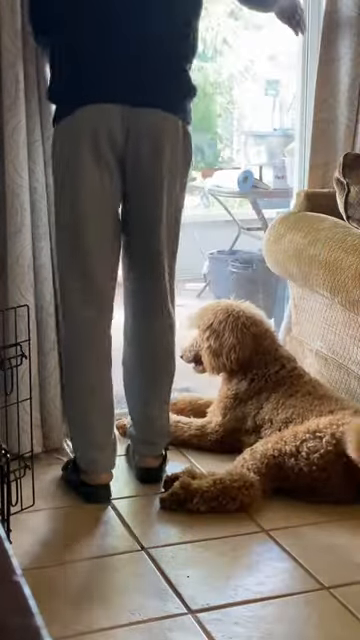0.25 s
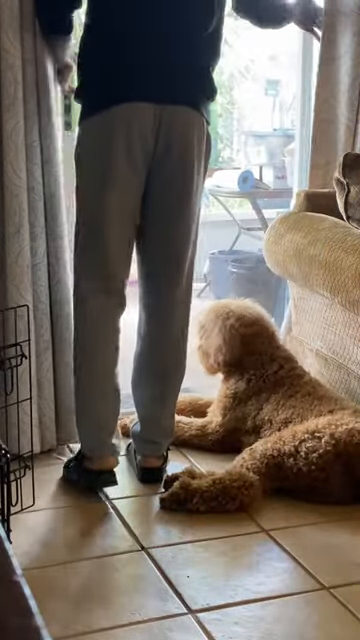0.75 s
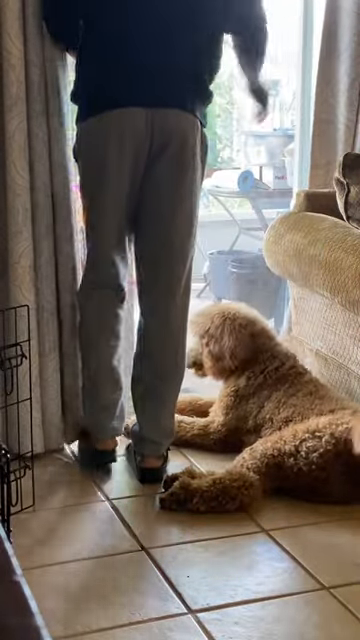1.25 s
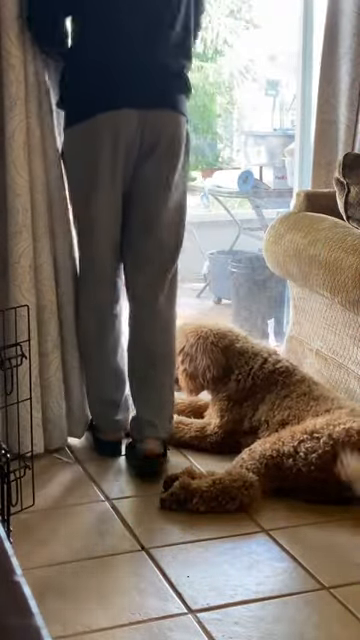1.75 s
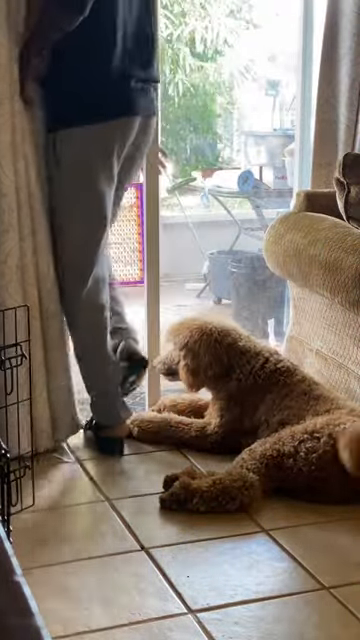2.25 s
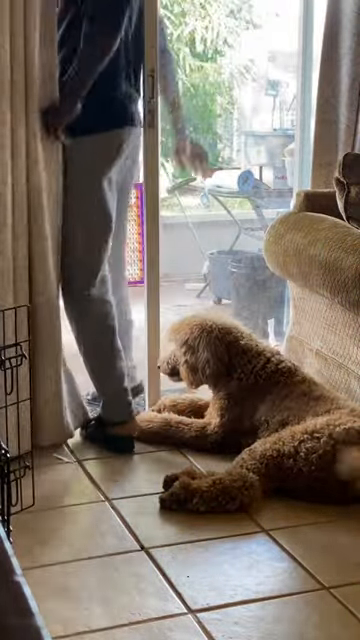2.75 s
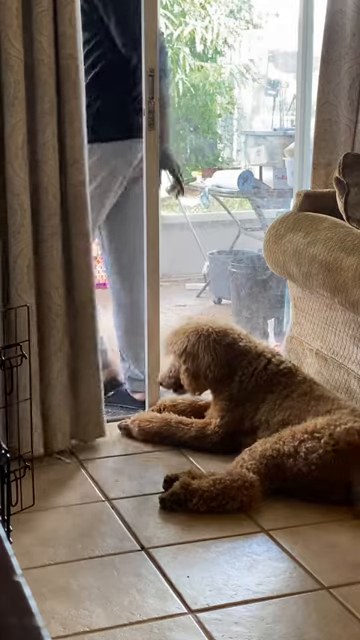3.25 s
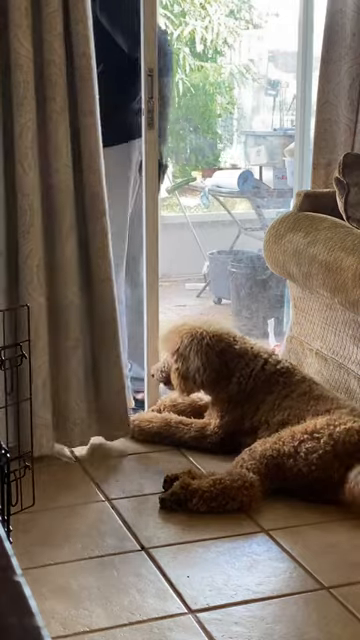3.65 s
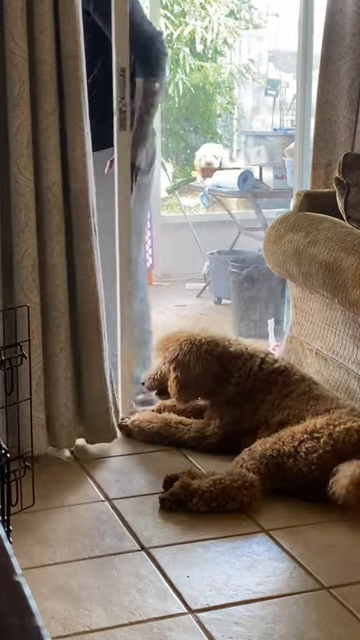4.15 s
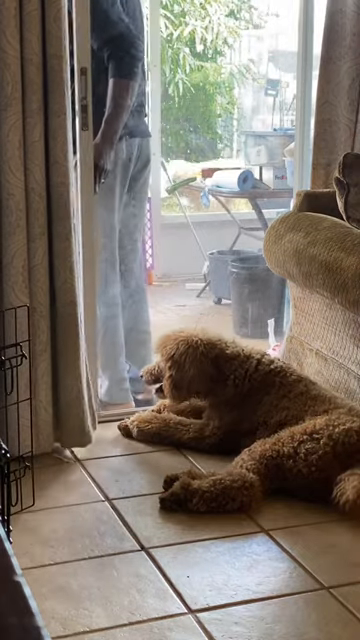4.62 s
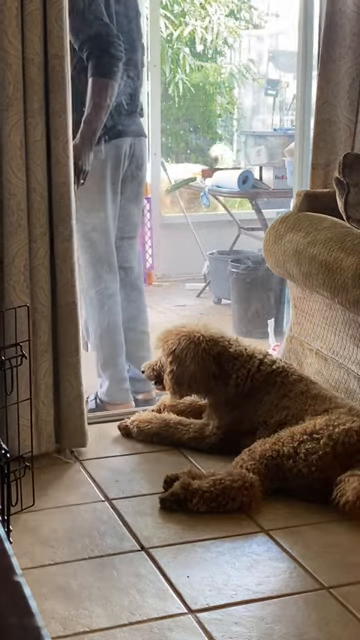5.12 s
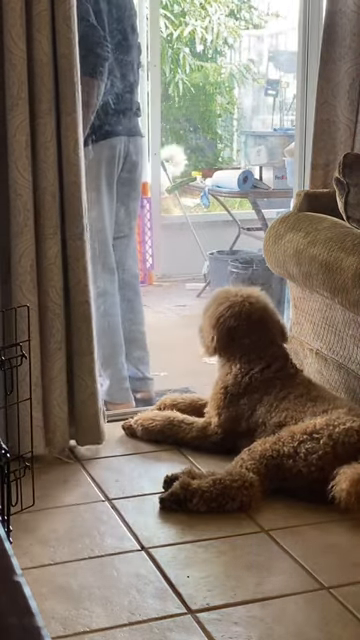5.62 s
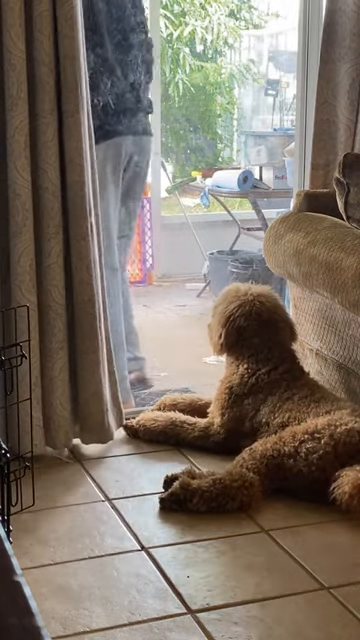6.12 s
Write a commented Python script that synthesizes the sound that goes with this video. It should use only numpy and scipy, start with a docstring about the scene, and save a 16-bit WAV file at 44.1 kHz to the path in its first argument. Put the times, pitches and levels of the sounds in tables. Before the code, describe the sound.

Close indoor sound of a sliding patio door: a brief scuff, then a swelling, gritty roll with deep glass rumble and a jangling metallic latch. Hollow knocks and soft footfalls fill the middle. A second, longer roll grinds along the track to a sharp click, then fades into scuffs and low bumps. A low hum and wavering bass boom lie underneath, nearly centred, with very faint hiss.

```python
"""First a soft boom, a knock and a scuff over a low room hum; then a heavy glass door rolls along its track, twice.
Place: a tiled room, with two close microphones that hear nearly the same sound.
The pane booms as a wavering sine, a low pane mode near 90 Hz; the rollers are dense random contacts that
shake the glass, grind in the track and hiss over grit. The loose latch rattles as taps into ringing modes;
frame and sandals knock and scuff as short noise bursts, pushes and rubs."""
import sys
import numpy as np
from scipy import signal
from scipy.fft import rfft, irfft, next_fast_len
from scipy.io import wavfile
from scipy.ndimage import uniform_filter1d

SR = 44100
rng = np.random.default_rng(int(sys.argv[2]) if len(sys.argv) > 2 else 0)


def unload_audio(sound):
    """Save the sound as a 16-bit wav file, at the path given as the first command line argument."""
    columns = np.transpose(np.atleast_2d(sound))
    # keep every value between -1 and 1, then stretch to whole-number steps
    steps = np.round(np.clip(columns, -1, 1) * 32767)
    wavfile.write(sys.argv[1], SR, steps.astype(np.int16))


N = 281269   # samples


def from_db(db):
    """Decibels to gain."""
    return 10 ** (np.asarray(db) / 20)


def rms_one(x):
    """Scale to unit rms."""
    return x / np.sqrt(np.mean(x ** 2) + 1e-20)


def in_time(rows):
    """Columns of a curve, the first being t/s, at every sample."""
    s, *columns = np.transpose(rows)
    return [np.interp(np.arange(N) / SR, s, c) for c in columns]


def coloured(x, spectrum):
    """Weigh each frequency by a table of f/Hz and level/dB, joined along log frequency."""
    hz, db = np.transpose(spectrum)
    size = next_fast_len(N)
    log_hz = np.log(np.arange(size // 2 + 1) * SR / size + 1)
    gain = from_db(np.interp(log_hz, np.log(hz), db))
    return irfft(rfft(x, size) * gain, size)[..., :N]


def dulled(x, hz):
    """Steep low-pass: heavy bodies carry little above their modes."""
    return signal.sosfilt(signal.butter(4, min(hz, .45 * SR), fs=SR, output="sos"), x)


def drift(rate):
    """Slow chance of rms 1: low-passed noise made at every 40th sample; a higher rate wavers faster."""
    r = np.exp(-80 * np.pi * rate / SR)
    noise = rng.standard_normal(N // 40 + 2002)
    slow = signal.lfilter([1], [1, -2 * r, r * r], noise)[2000:]   # the filter has settled
    return np.interp(np.arange(N) / 40, np.arange(len(slow)), rms_one(slow))


def grains(per_s, spread_db):
    """Uneven clicks at random times, one draw for the direct sound and one for the diffuse sound."""
    sizes = from_db(spread_db * np.minimum(rng.exponential(1, (2, N)), 4))
    signs = rng.choice([-1, 1], (2, N))
    return sizes * signs * (rng.random((2, N)) < per_s / SR) + 1e-18


def bursts(times, level_db, hold_s, t60, rise_s):
    """Envelope of events that rise up to their time, hold and die away; overlaps add in power."""
    out = np.zeros(N)
    for s, db, hold, fall in np.broadcast(times, level_db, hold_s, t60):
        start = max(round((s - rise_s) * SR), 0)
        t = np.arange(min(SR // 2, N - start)) / SR
        decay_db = 60 * np.maximum(t - rise_s - hold, 0) / max(fall, .01)
        shape = np.minimum(t / rise_s, 1) * from_db(db - decay_db)
        out[start:start + len(t)] = np.hypot(out[start:start + len(t)], shape)
    return out


def resonance(x, hz, width_hz):
    """One mode driven by x, gain 1 on top."""
    r = np.exp(-np.pi * width_hz / SR)
    top = np.array([1, 0, -1]) * (1 - r * r) / 2
    return signal.lfilter(top, [1, -2 * r * np.cos(2 * np.pi * hz / SR), r * r], x)


def mode_sum(x, modes, waver_db=0):
    """Modes in parallel, signs alternating; each may swell and fade by chance."""
    out = 0
    for k, (hz, width_hz, db) in enumerate(modes):
        level_db = db + waver_db * drift(3.6) if waver_db else db
        out = out + from_db(level_db) * (-1) ** k * resonance(x, hz, width_hz)
    return out


def modes_of(x, modes):
    """Modes in parallel, scaled to rms 1."""
    return rms_one(mode_sum(x, modes))


def evened(x, window_s):
    """A mode that is driven all the time keeps a fairly even swing."""
    return x / np.sqrt(uniform_filter1d(x ** 2, round(window_s * SR), axis=-1) + 0.026)


# Spectrum of the low room hum: f/Hz, relative level/dB (per Hz)
HUM_SPECTRUM = [(15, -44), (25, -16.5), (43, -5.5), (91, 6.5), (213, -18), (281, -21), (328, -24),
                (377, -9.5), (516, -41), (604, -40.5), (1600, -57), (2080, -87), (3520, -120)]
# Spectrum of the faint steady hiss in the air: f/Hz, relative level/dB (per Hz)
AIR_SPECTRUM = [(880, -31.5), (1500, -1), (1940, -9.5), (3160, -11.5), (3910, -8), (4840, -11),
                (12500, -16.5), (16200, -43.5), (22000, -120)]


def room():
    """Low hum and a faint steady hiss: noise shaped to each spectrum."""
    hum_db, air_db = -56, -93.5   # rms
    hum = from_db(hum_db) * rms_one(coloured(rng.standard_normal((2, N)), HUM_SPECTRUM))
    air = from_db(air_db) * rms_one(coloured(rng.standard_normal((2, N)), AIR_SPECTRUM))
    return hum + air


# Thin high ticks near the microphones: t/s, level/dB (before the common trim)
TICK_EVENTS = [(0.0294, -66), (1.3094, -82), (1.566, -70), (1.5853, -69.5), (1.6811, -71.5), (1.6886, -67),
               (2.0717, -70.5), (2.0996, -69), (2.1899, -74)]
# What a tick rings: f/Hz, width/Hz, relative level/dB
TICK_RESONANCES = [(7000, 2500, 0), (11200, 510, 3), (13300, 1300, 3), (15000, 1700, -8.5)]


def ticks():
    """Brief bursts of fine contacts ring a few high modes."""
    s, tick_db = np.transpose(TICK_EVENTS)
    envelope = bursts(s, tick_db - 11, hold_s=0.0037, t60=0.033, rise_s=.001)
    return envelope * modes_of(grains(9000, spread_db=3.5), TICK_RESONANCES)


# Spectrum of grit in the track: f/Hz, relative level/dB (per Hz)
GRIT_SPECTRUM = [(1000, -12.5), (1700, 1.5), (2300, -5), (2500, -5), (2850, -1), (4250, -10), (4800, -6),
                 (5170, -21), (5890, -17.5), (8650, -37), (12000, -30), (15600, -53.5), (22000, -120)]
# Modes of the metal track: f/Hz, width/Hz, relative level/dB (before the waver)
TRACK_MODES = [(2254, 330, -3), (2960, 110, 1), (3810, 410, -8.5), (4557, 48, 5.5), (5290, 390, 9.5),
               (5870, 56, 7.5), (7500, 48, 1)]


def track(contacts, ring):
    """The metal track: broad grit with its modes standing out, each swelling and fading by chance."""
    grit = rms_one(coloured(contacts, GRIT_SPECTRUM))
    modes = mode_sum(grit, TRACK_MODES, waver_db=3.5)
    return rms_one(grit + ring * rms_one(modes))


# Scuffs: t/s, rub level/dB, top-treble level/dB (both before their trims)
SCUFF_EVENTS = [(0.013, -54, -61), (0.111, -80, -72.5), (0.456, -61.5, -72), (0.495, -68, -75),
                (0.538, -53.5, -70), (0.677, -52.5, -75), (0.728, -45.5, -61), (0.777, -75, -64),
                (0.8207, -39, -49), (0.8894, -46, -56), (0.943, -49.5, -59), (1.002, -46.5, -50),
                (1.3622, -49.5, -69), (1.4335, -54, -75), (1.6806, -54, -64), (1.7226, -55, -70.5),
                (1.865, -61, -70), (2.061, -55.5, -77), (2.1063, -63, -86), (2.189, -60, -73.5),
                (2.322, -74, -91), (2.409, -69, -81), (2.74, -71, -92), (2.82, -64, -83), (2.951, -63, -71),
                (3.2234, -67, -92), (3.473, -63, -86), (3.6044, -57.5, -87), (3.6523, -59, -78),
                (3.749, -57.5, -86), (3.8455, -57.5, -91), (3.984, -52, -86), (4.099, -55, -90),
                (4.1568, -46, -70), (4.2113, -53, -81), (4.259, -52, -85), (4.4594, -45, -51),
                (4.545, -49.5, -80), (4.617, -49.5, -81), (4.696, -63, -95), (4.9027, -73, -95),
                (5.03, -56.5, -80), (5.2006, -70, -96), (5.5056, -54.5, -87), (5.553, -86, -74),
                (5.686, -76, -94.5), (5.787, -75.5, -90)]
# Spectrum of the top treble of a scuff: f/Hz, relative level/dB (per Hz)
SCUFF_TREBLE = [(2820, -34), (4800, 12), (5330, 5), (6210, 6.5), (8660, -6), (10100, -17), (11000, -27),
                (14300, -49.5), (22000, -120)]


def scuffs():
    """Short rubs: grit that holds for a moment and dies, its top treble faster."""
    s, rub_db, top_db = np.transpose(SCUFF_EVENTS)
    contacts = grains(9000, spread_db=3.5)
    rub = track(contacts, ring=0.71)
    top = rms_one(coloured(contacts, SCUFF_TREBLE))
    # the first contact is the sharpest
    onset = bursts(s, rub_db - 25.5, hold_s=0.00033, t60=0.017, rise_s=0.0014)
    body = bursts(s, rub_db - 16, hold_s=0.016, t60=0.26, rise_s=0.0027)
    treble = bursts(s, top_db - 11, hold_s=0.008, t60=0.18, rise_s=0.0013)
    return dulled((onset + body) * rub + treble * top, 11000)


# Modes of the glass pane, from low to high: f/Hz, width/Hz, relative level/dB
PANE_MODES = [(61.6, 6.9, 0), (145.4, 20.8, -6), (252.7, 12, -5), (299, 9.3, -4.5), (388.7, 15.95, -0.5),
              (419.5, 34, -6.5), (521.2, 5.9, 0.5), (597, 150, -11)]
# Broad rumble of glass and frame: f/Hz, relative level/dB (per Hz)
RUMBLE_SPECTRUM = [(110, -24), (180, -3), (205, -1), (296, 5), (351, -4.5), (421, -1), (900, -39),
                   (1170, -61), (1980, -120)]


def pane(x, broad_db):
    """The glass and frame: the upper modes stand out of a broad rumble."""
    upper = dulled(modes_of(x, PANE_MODES[2:]), 750)
    broad = rms_one(coloured(x, RUMBLE_SPECTRUM))
    return rms_one(upper + from_db(broad_db) * broad)


# Knocks on frame and floor: t/s, slap level/dB, body level/dB, body f/Hz, floor thump level/dB
# (levels before the trims of each part)
KNOCK_EVENTS = [(0.017, -55, -52, 255, -65), (0.268, -88, -57.5, 202, -65), (0.412, -66, -45.5, 188, -56),
                (0.677, -46, -41, 175, -58), (0.822, -43.5, -43, 412, -69), (0.998, -34, -38.5, 271.5, -68),
                (1.087, -34, -43.5, 293, -72.5), (1.427, -40.5, -48.5, 259.6, -77),
                (1.682, -48, -43, 252, -44), (1.751, -39, -38, 265.7, -58), (1.864, -53, -51.5, 263, -55),
                (2.062, -43.5, -39, 279.4, -68), (2.163, -53, -46, 245, -52.5), (2.324, -40, -41, 250, -58),
                (2.496, -47.5, -45, 230, -68), (2.785, -48, -77, 182, -70), (2.925, -52.5, -66.5, 184, -76),
                (3.223, -39.5, -42, 336.6, -61), (3.475, -43, -56.5, 366, -53), (3.604, -38, -40, 333, -59),
                (3.751, -42, -58, 316, -60), (3.82, -50, -58, 446, -68), (3.987, -37.5, -48.5, 297, -56),
                (4.16, -45, -48, 279, -70), (4.468, -40.5, -65, 289, -67), (5.038, -51, -57.5, 204, -71.5),
                (5.199, -49, -58.5, 198, -63), (5.507, -42.5, -44, 265, -50.5),
                (5.677, -66, -57.5, 215, -55.5), (5.779, -59, -52, 213, -59.5)]
# Spectrum of the slap: f/Hz, relative level/dB (per Hz)
SLAP_SPECTRUM = [(300, -30), (480, -2), (720, -4.5), (850, -11), (1450, -19), (1800, -37.5), (4000, -47.5),
                 (8000, -92.5)]


def knocks():
    """A blow: a sharp slap, a push that rings at its own pitch, the pane rumbling on, a slow floor thump."""
    s, slap_db, body_db, body_hz, thump_db = np.transpose(KNOCK_EVENTS)
    noise = rng.standard_normal((2, N))
    slap = bursts(s, slap_db - 12.5, hold_s=0.0062, t60=0.31, rise_s=0.00066)   # rms lies below the peak
    rumble = bursts(s + 0.015, body_db, hold_s=0.015, t60=0.35, rise_s=0.0025)
    out = slap * rms_one(coloured(noise, SLAP_SPECTRUM))
    out += rumble * pane(noise, broad_db=14.5)
    t = np.arange(SR // 5) / SR
    starts = np.round(s * SR).astype(int)
    for at, crack_db, db, hz, low_db in zip(starts, slap_db, body_db, body_hz, thump_db):
        push = from_db(db + 3 - 60 * t / 0.26) * np.minimum(t / 0.012, 1) * np.sin(2 * np.pi * hz * t)
        thump = from_db(low_db - 2) * np.sin(np.pi * t / t[-1]) ** 2 * np.sin(2 * np.pi * 31 * t)
        # the first contact rings the frame
        crack = from_db(crack_db - 5 - 60 * t / 0.024) * np.sin(2 * np.pi * 680 * t)
        out[0, at:at + len(t)] += (push + thump + crack)[:N - at]   # direct sound only
    return out


# Jolts of the loose latch: t/s, level/dB (before the trims of tap and chatter)
LATCH_JOLTS = [(0.0217, -53), (0.5474, -57.5), (0.8288, -32.5), (0.8604, -46.5), (0.8909, -37),
               (0.912, -39.5), (0.9417, -37), (1.0083, -36), (1.051, -50), (3.8473, -49.5), (3.923, -65),
               (3.9877, -50), (4.0447, -51), (4.104, -48), (4.1618, -45), (4.2078, -51), (4.2685, -52.5),
               (4.4673, -31), (4.5549, -44), (4.6262, -47), (4.703, -49.5), (4.789, -57.5), (4.9009, -53),
               (5.0414, -53), (5.2034, -57.5), (5.2956, -58), (5.3714, -61.5)]
# Modes of the latch: f/Hz, relative level/dB, t60/s
LATCH_MODES = [(1262, -7.5, 0.11), (1220, -11.5, 0.045), (1243, 0, 0.027), (1284, -3.5, 0.17),
               (1410, -13, 0.051), (1330, -22.5, 0.088), (1875, -17.5, 0.043), (2530, -21.5, 0.025),
               (3010, -20, .04), (6475, -35.5, 0.027)]


def latch():
    """Each jolt is one firm tap and a short dense chatter, ringing the latch modes."""
    s, jolt_db = np.transpose(LATCH_JOLTS)
    chatter = bursts(s, jolt_db - 23.5, hold_s=0.004, t60=0.21, rise_s=0.0038)
    taps = chatter * grains(4200, spread_db=-0.5)
    taps[:, np.round(s * SR).astype(int)] += from_db(jolt_db - 9)
    taps = dulled(taps, 7900)   # contacts are slightly soft
    out = 0
    for hz, db, t60 in LATCH_MODES:
        r, w = from_db(-60 / (t60 * SR)), 2 * np.pi * hz / SR
        driven = taps * from_db(1.2 * drift(25))   # each tap lands elsewhere
        ringing = signal.lfilter([0, np.sin(w)], [1, -2 * r * np.cos(w), r * r], driven)
        out = out + from_db(db) * ringing
    return out


# Rolling, before chance bumps: t/s, rumble level/dB, grind level/dB, grit hiss level/dB
ROLLING_LEVELS = [(0.0, -66.5, -77, -96), (0.34, -62.5, -67.5, -88.5), (0.51, -55.5, -66.5, -88),
                  (0.66, -47.5, -60.5, -69.5), (0.91, -39.5, -54, -65.5), (1.12, -45, -67, -69),
                  (1.31, -45, -62.5, -74), (1.47, -50.5, -73, -74.5), (1.76, -58.5, -66, -97.5),
                  (1.9, -50, -70, -85), (2.27, -54, -74.5, -101.5), (2.45, -55.5, -78, -89),
                  (2.7, -60, -74.5, -96), (2.84, -59.5, -69.5, -93), (3.53, -52.5, -74.5, -93.5),
                  (4.16, -47, -62, -71), (4.55, -47.5, -60.5, -71.5), (4.71, -50.5, -62, -87),
                  (4.85, -60.5, -71, -85.5), (5.12, -66, -72.5, -89.5), (5.43, -57.5, -74, -85.5),
                  (5.67, -55.5, -72.5, -93.5), (5.86, -70.5, -87.5, -107), (6.38, -68.5, -95.5, -106)]
# Low shake of the door, with low knocks near 5.8 and 5.9 s, before chance waver:
# t/s, second pane mode level/dB, deep mode level/dB
LOW_MODE_LEVELS = [(0.0, -50.5, -65), (0.1, -63, -67), (0.28, -61.5, -62), (0.48, -53, -52.5),
                   (0.8, -43, -54), (0.96, -38.5, -38.5), (1.1, -45.5, -47), (1.63, -56, -60.5),
                   (1.69, -41.5, -46), (1.95, -50.5, -55), (2.15, -50.5, -40.5), (2.24, -54.5, -49),
                   (3.85, -52.5, -60.5), (4.49, -47.5, -47), (5.43, -57.5, -56.5), (5.56, -40.5, -40.5),
                   (5.76, -56.5, -48), (5.81, -33.5, -45), (5.86, -63, -51.5), (5.91, -41, -65.5),
                   (5.95, -66, -58.5), (6.38, -74.5, -59)]
# Spectrum of the grind in the track: f/Hz, relative level/dB (per Hz)
GRIND_SPECTRUM = [(500, -23.5), (700, -4.5), (850, 1), (970, -1.5), (1150, -1.5), (1300, -4.5), (1480, -9),
                  (1800, -23), (2600, -38.5), (3400, -48)]


def rolling():
    """Rollers over grit: contacts shake the pane, grind and hiss; low knocks near 5.8 and 5.9 s."""
    rumble_db, grind_db, grit_db = in_time(ROLLING_LEVELS)
    second_db, deep_db = in_time(LOW_MODE_LEVELS)
    low_noise = dulled(rng.standard_normal((2, N)), 200)
    deep = evened(modes_of(resonance(low_noise, 58, 43), PANE_MODES[:1]), window_s=0.091)
    second = evened(modes_of(resonance(low_noise, 131.6, 46), PANE_MODES[1:2]), window_s=.05)
    rumble = pane(grains(700, spread_db=4), broad_db=6.5)
    grind = rms_one(coloured(grains(2500, spread_db=2), GRIND_SPECTRUM))
    grit = track(grains(4000, spread_db=3.8), ring=1.3)
    waver_db = 1.43   # chance swell and fade of the low modes
    bumps_db = 1.5 * drift(22)   # shared by rumble, grind and grit
    out = from_db(deep_db + waver_db * drift(6.5)) * deep
    out += from_db(second_db + waver_db * drift(5.6)) * second
    out += from_db(rumble_db + bumps_db) * rumble
    out += from_db(grind_db + bumps_db + 0.72 * drift(27)) * grind
    out += from_db(grit_db + bumps_db + 0.99 * drift(40)) * grit
    return dulled(out, 15000)


# Low boom of the pane near 90 Hz, before chance waver: t/s, f/Hz, level/dB
BOOM_CURVE = [(0.0, 91.1, -48), (1.01, 90.5, -43), (1.74, 91.0, -43), (1.76, 90.8, -38),
              (1.97, 90.9, -43.5), (2.13, 90.9, -37), (2.2, 90.6, -50), (2.26, 89.7, -43),
              (2.38, 85.4, -43.5), (2.65, 85.9, -49), (2.72, 91.0, -56.5), (3.21, 90.8, -46.5),
              (3.27, 90.8, -38.5), (3.32, 91.0, -46.5), (3.46, 90.4, -40.5), (4.56, 93.1, -46.5),
              (5.28, 91.6, -48), (5.45, 83.5, -59), (5.52, 84.7, -41.5), (5.86, 83.0, -42.5),
              (6.18, 82.7, -67), (6.38, 94.7, -54.5)]


def boom():
    """The pane swings on a low mode near 90 Hz; uneven driving makes phase and level waver."""
    hz, level_db = in_time(BOOM_CURVE)
    phase = 2 * np.pi * np.cumsum(hz) / SR + drift(5.2)   # waver in radians
    level_db = level_db + 1.43 * drift(7.4) + 1.75 * drift(46)   # slow and quick waver
    swing = np.sqrt(2) * from_db(level_db) * np.sin(phase)
    return np.array([swing, np.roll(swing, SR // 360)])   # diffuse copy: about a quarter cycle late


# Side against mid: f/Hz, level/dB
SIDE_WIDTH = [(60, -24.5), (110, -18), (200, -16), (380, -9), (700, -5), (1290, -2.5), (2380, -3),
              (4400, -3), (8120, -0.5), (15000, 6.5)]
# Unrelated share of the side: f/Hz, level/dB
DIFFUSE_SHARE = [(100, -0.5), (400, -5.5), (900, 0.5), (2500, -11), (8000, -4)]
# Left against right, half of it put on each: f/Hz, level/dB
LEFT_LEAN = [(60, 0), (110, 1), (200, 0.5), (380, 1), (700, 2), (1290, 3), (2380, -0.5), (4400, 0.5),
             (8120, 0), (15000, -3)]


def scene():
    """The left capsule leads a little: the side is direct sound a quarter turn ahead plus diffuse sound."""
    direct, diffuse = room() + ticks() + scuffs() + knocks() + latch() + rolling() + boom()
    ahead = -signal.hilbert(direct, next_fast_len(N)).imag[:N]
    side = coloured(0.5 * ahead + coloured(diffuse, DIFFUSE_SHARE), SIDE_WIDTH)
    # deep bass reaches both alike
    side = signal.sosfilt(signal.butter(2, 55, "high", fs=SR, output="sos"), side)
    lean = np.array(LEFT_LEAN) * [1, .5]
    left = coloured(direct + side, lean)
    right = coloured(direct - side, lean * [1, -1])
    return np.array([left, right])


def low_pass(x):
    """Removes everything above the highest recorded frequency."""
    return signal.sosfilt(signal.butter(12, 15710, fs=SR, output="sos"), x)


# Microphone hiss: f/Hz, level/dB (against white noise)
HISS_SPECTRUM = [(1500, -99), (9000, -100), (11500, -103), (16000, -112)]


def record(dry):
    """The microphone housing has a narrow dip; faint hiss sits in opposite phase on the two sides."""
    notch_hz, notch_q = 4800, 5.4
    housed = signal.lfilter(*signal.iirnotch(notch_hz, notch_q, SR), dry)
    hiss = coloured(rng.standard_normal(N), HISS_SPECTRUM)
    return low_pass(housed + hiss * [[1], [-1]])


dry = scene()
out = record(dry)
unload_audio(out)
```